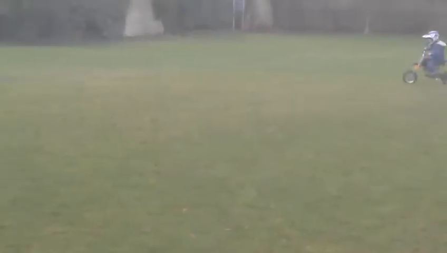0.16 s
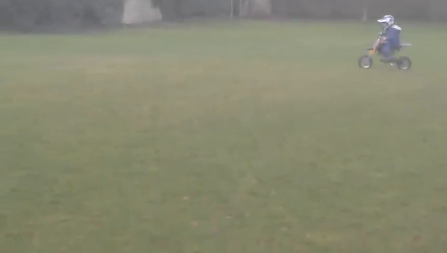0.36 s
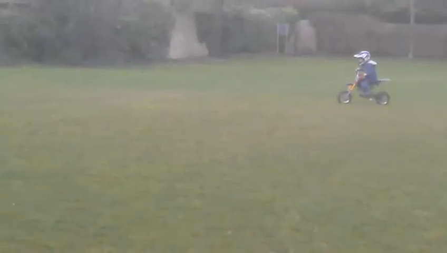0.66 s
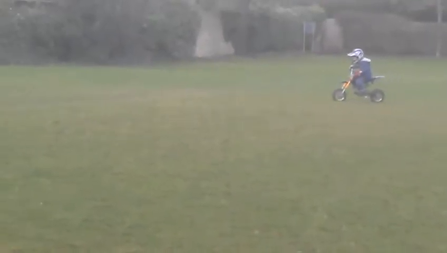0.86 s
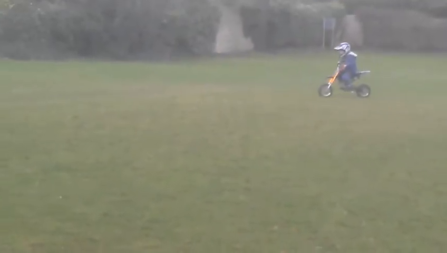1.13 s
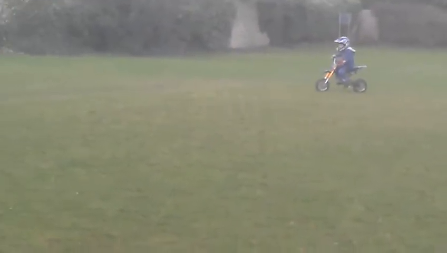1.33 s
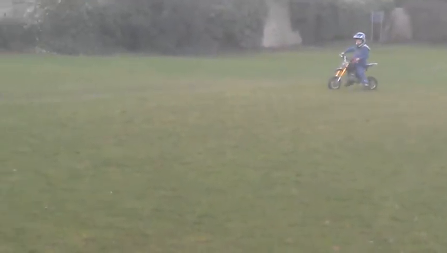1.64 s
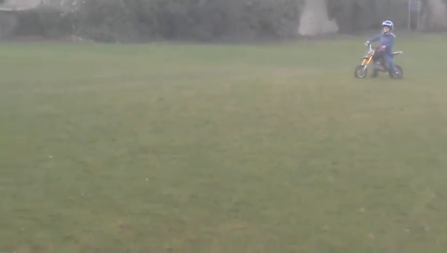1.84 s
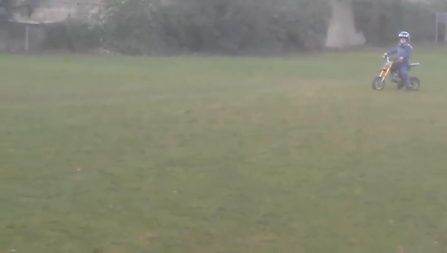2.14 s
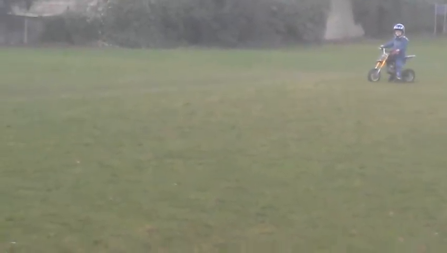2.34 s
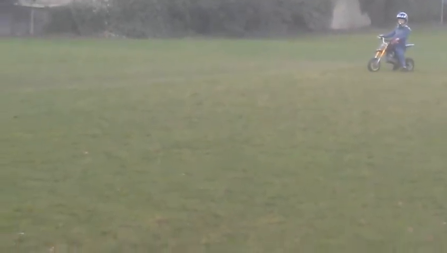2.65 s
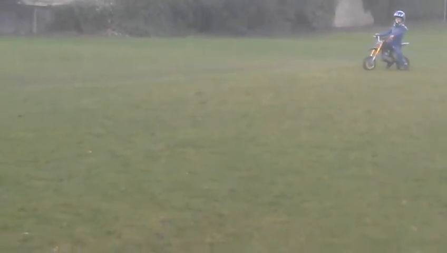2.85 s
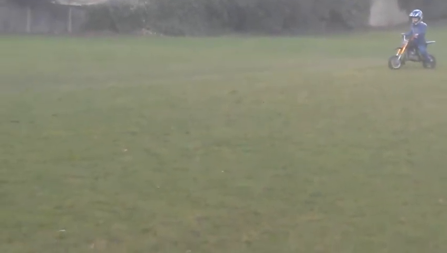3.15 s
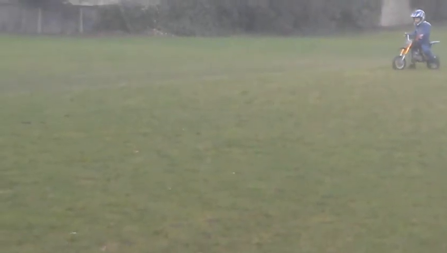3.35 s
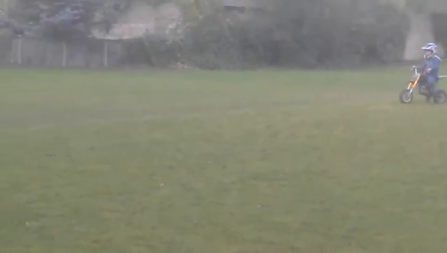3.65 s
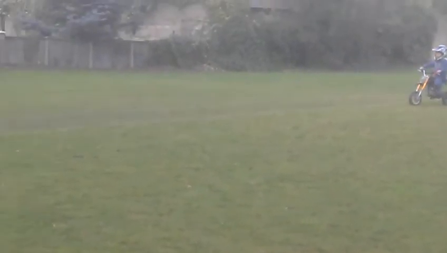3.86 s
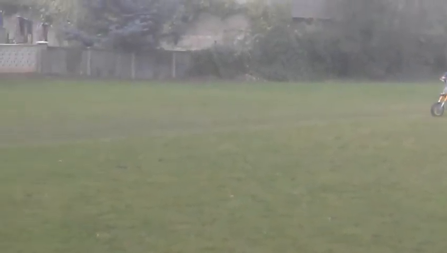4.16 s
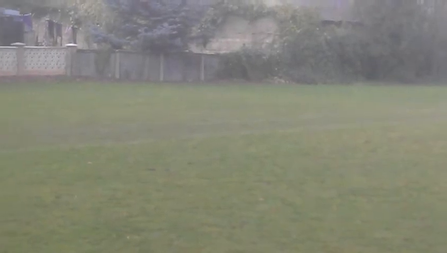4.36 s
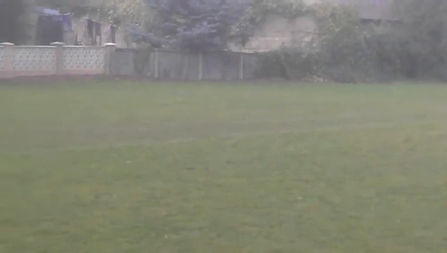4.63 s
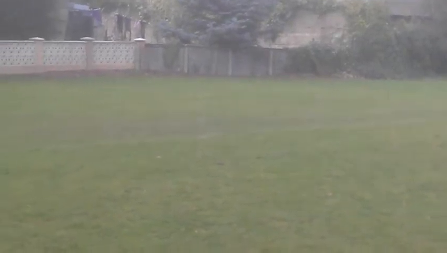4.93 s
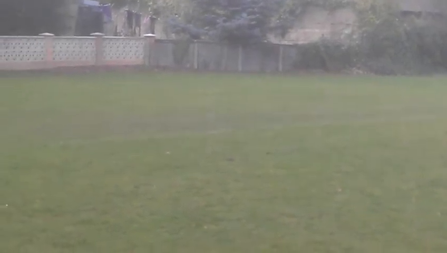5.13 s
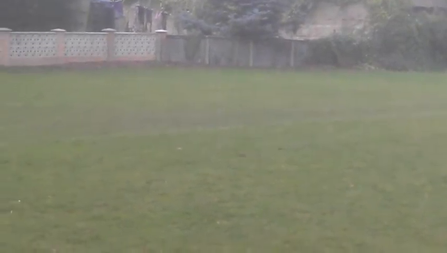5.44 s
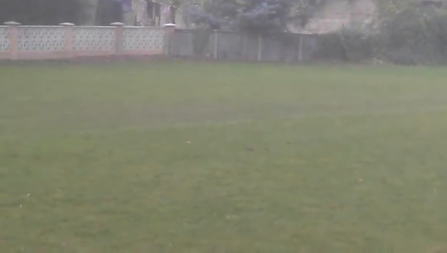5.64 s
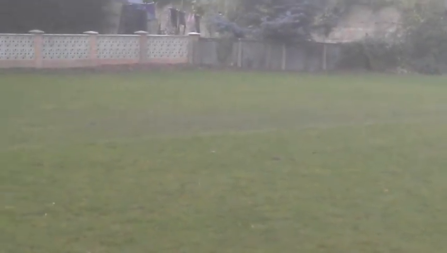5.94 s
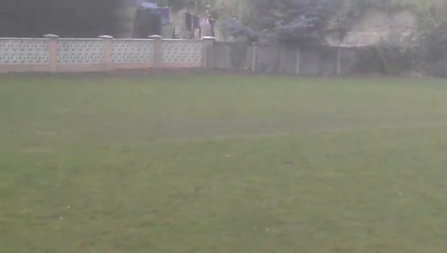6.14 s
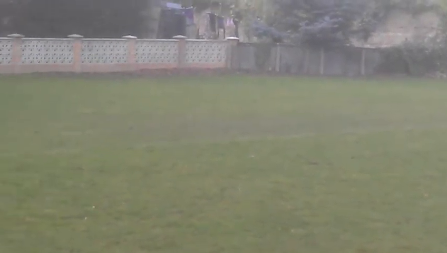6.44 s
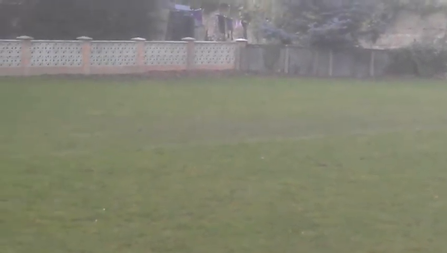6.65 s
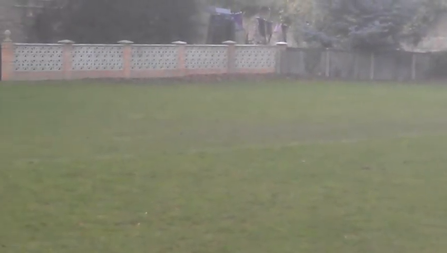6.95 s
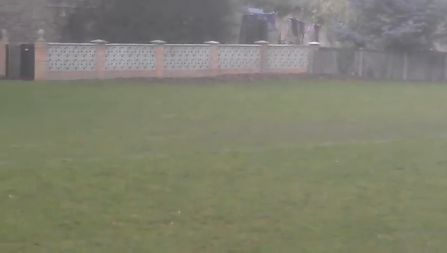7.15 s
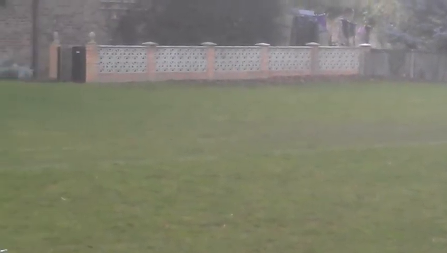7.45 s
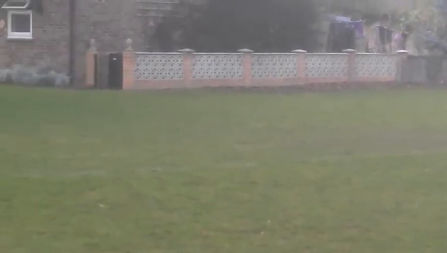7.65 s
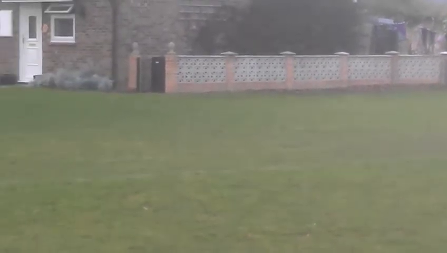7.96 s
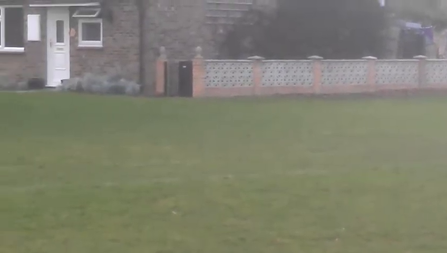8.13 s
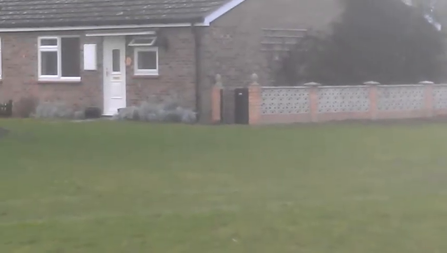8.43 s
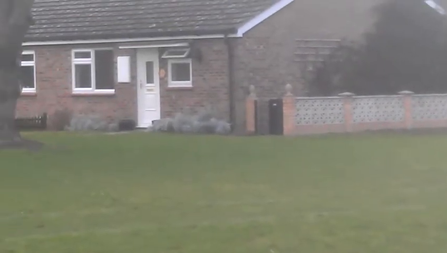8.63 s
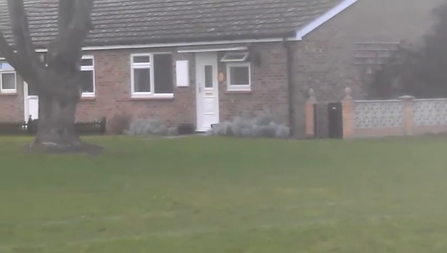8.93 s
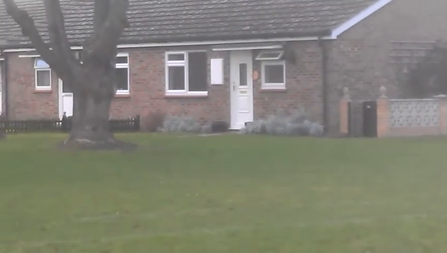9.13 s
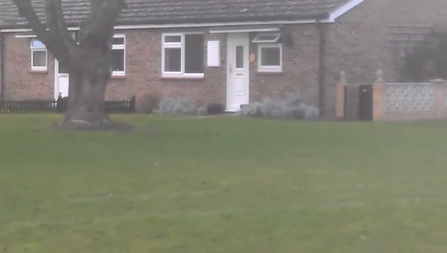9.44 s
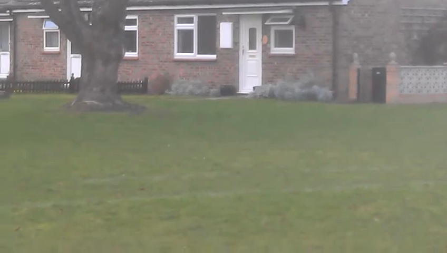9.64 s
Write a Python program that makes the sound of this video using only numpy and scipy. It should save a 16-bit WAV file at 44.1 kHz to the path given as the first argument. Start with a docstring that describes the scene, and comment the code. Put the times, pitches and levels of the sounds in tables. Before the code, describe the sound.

A small electric bike is blipped on and off, with a thin high whine, rattling chain rushes, ticks and one sharp snap.

```python
"""A small electric bike is blipped on and off on a lawn, close to a stereo camera microphone.
Each blip starts with the controller's switching whine, whose sidebands spread as the motor speeds up;
the gears sing, and chain and tyres rush up to a rattle at release. Loose parts tick, plastic snaps
and short pips ring. A bird chirps between the garden walls; far off are faint hums, traffic and wind."""
import sys
import numpy as np
from scipy import signal
from scipy.fft import rfft, irfft, next_fast_len
from scipy.io import wavfile
from scipy.ndimage import uniform_filter1d

SR = 44100
rng = np.random.default_rng(int(sys.argv[2]) if len(sys.argv) > 2 else 0)


def unload_audio(sound):
    """Save the sound as a 16-bit wav file, at the path given as the first command line argument."""
    columns = np.transpose(np.atleast_2d(sound))
    # keep every value between -1 and 1, then stretch to whole-number steps
    steps = np.round(np.clip(columns, -1, 1) * 32767)
    wavfile.write(sys.argv[1], SR, steps.astype(np.int16))


N = 431723
T = np.arange(N) / SR
FFT_SIZE = next_fast_len(N)
BIN_HZ = np.maximum(np.fft.rfftfreq(FFT_SIZE, 1 / SR), 1)

# The chain's rush from close by, as the microphone colours it: bright band, low body and top hiss.
# Each row: frequency in Hz, relative spectral density in dB.
BRIGHT_RUSH_SPECTRUM = [(1800, -33), (2500, -8.5), (3000, 3), (3800, 4), (4650, -2.5), (5300, 1),
                        (5900, 0.5), (6600, -11.5), (7000, -33)]
BODY_SPECTRUM = [(35, -69), (60, -31.5), (187, -7.5), (411, -8.5), (481, -2), (725, -1), (918, -5),
                 (1300, -2), (1750, -7.5), (1960, -5.5), (2600, -18.5), (3380, -18), (5720, -120)]
HISS_SPECTRUM = [(6200, -60), (6700, -9.5), (7300, 0), (7800, 7), (8400, 2), (9200, -10), (10200, -5),
                 (11300, -16.5), (12600, -17), (13500, -58)]


def chain_and_tyres():
    """Dense, uneven impacts of chain links and of tyres on grass merge into a grainy rush."""
    bright, body, hiss = surge_gains()
    grain = undb(3.5 * walk(900) + 0.77 * walk(60) + 1.7 * walk(21))
    high = patchy(grain * rng.standard_normal((2, N)), patch_db=3.5)
    low = patchy(grain ** 0.24 * rng.standard_normal((2, N)), patch_db=2.0)
    return (bright * colour(high, BRIGHT_RUSH_SPECTRUM) + body * colour(low, BODY_SPECTRUM)
            + hiss * colour(high, HISS_SPECTRUM))


# Surges of the drive. Each row: release in seconds, seconds of drive before it, climb in dB per second,
# rattle at release in dB, fall in dB per second, then the peaks of bright band, body and hiss in dB.
SURGE_EVENTS = [(.52, .9, 10, -0.5, 73, -45.5, -45, -41), (0.664, 0.014, 500, 4, 88, -39.5, -40, -43),
                (1.0, 0.14, 42, 0.5, 32, -55, -52.5, -65), (1.89, .08, 122, 2, 118, -61.5, -54, -63),
                (2.07, 0.11, 90, 3, 58, -62.5, -52, -61), (2.33, 0.13, 80, 3, 50, -62, -51.5, -62),
                (2.82, .13, 61, 1.5, 22.5, -57, -49, -59.5), (2.931, .04, 148, 5, 90, -53, -47, -50.5),
                (3.56, 0.026, 196, 3.5, 33, -49, -50, -56), (3.801, 0.26, 41.5, 0.5, 74, -50, -46.5, -50),
                (4.67, 0.16, 124, -4, 148, -44.5, -47, -43),
                (4.761, 0.093, 84, 2.5, 122, -34.5, -36, -30.5),
                (5.538, 0.41, 48, 4.5, 93, -38.5, -37.5, -39), (5.94, .09, 85, 0.5, 63, -54, -51, -58),
                (6.45, .14, 56, 2.5, 25, -49, -48, -50), (6.58, 0.14, 58, 2.5, 111, -41.5, -42, -42.5),
                (7.06, .07, 96, -1, 26, -50.5, -52.5, -50.5), (7.229, .15, 72, 3.5, 131, -33.5, -34, -35),
                (7.68, 0.1, 120, 2.5, 29, -45.5, -48.5, -44), (7.88, 0.21, 85, 2, 112, -30, -31, -29.5),
                (8.54, 0.31, 103, 0, 95, -28, -31, -29.5), (9.08, .06, 66, 0.5, 60, -46.5, -48, -57),
                (9.36, .14, 100, 1.5, 87, -41, -41, -37)]
# Rolling on the grass between surges. Each row: time in seconds, then bright band, body and hiss in dB.
ROLLING_LEVELS = [(0, -65, -61, -58), (.85, -68, -63.5, -59.5), (1.3, -60.5, -67, -66),
                  (1.7, -69.5, -61.5, -70.5), (1.8, -83, -71, -70.5), (2.5, -78, -57, -71.5),
                  (3.1, -72, -69, -78), (3.5, -65, -58.5, -72), (4.001, -73, -60, -69.5),
                  (4.4, -68.5, -58.5, -71.5), (5.05, -72, -58.5, -84), (5.75, -65, -63.5, -60.5),
                  (6.23, -80, -64, -71.5), (6.85, -73, -70, -69.5), (7.45, -64, -62.5, -66.5),
                  (8.15, -55, -53, -60.5), (8.9, -52.5, -52.5, -58), (9.2, -59.5, -62, -58.5),
                  (9.6, -66, -64, -73), (9.79, -64, -61.5, -66)]


def surge_gains():
    """Gains of the three bands: over the rolling, each surge climbs to a rattle and falls away."""
    take_up_db_per_s, rattle_s, shut_s = 345, 0.013, 0.039
    times, *levels = np.transpose(ROLLING_LEVELS)
    power = np.array([undb(2 * np.interp(T, times, db)) for db in levels])
    for release, driven, climb, rattle_db, fall, *peak_db in SURGE_EVENTS:
        here = slice(max(int((release - 1) * SR), 0), int((release + 1) * SR))
        t = T[here] - release
        after = np.maximum(t, 0)
        db = climb * np.minimum(t, 0) - fall * after
        db += take_up_db_per_s * np.minimum(t + driven, 0)  # far softer before the drive takes up
        db -= rattle_db * (1 - np.exp(-np.abs(t) / rattle_s))
        shut_db = np.outer([3.5, 1, 9], 1 - np.exp(-after / shut_s))  # extra drop as the throttle shuts
        power[:, here] += undb(2 * (np.array(peak_db)[:, None] + db - shut_db))
    return np.sqrt(power)


# Throttle blips, close to the microphone. Each row: start, time to peak and length in seconds, pitch in
# Hz, peak in dB, swell up to it in dB, final sideband spread in Hz, sidebands against the tone in dB.
BLIPS = [(0, 0.54, 0.54, 7795, -43.5, -4.5, 128, -18), (1.819, 0.073, .12, 7860, -52.5, 14, 650, -4),
         (1.999, 0.054, 0.15, 7855, -51, 9, 500, -8), (2.238, 0.11, 0.16, 7840, -50.5, 13, 151, -12),
         (2.501, 0.45, .46, 7820, -60, 9.5, 219, 3.5), (3.259, 0.64, 0.62, 7830, -57, 14, 351, 3.5),
         (4.436, 0.2, 0.24, 7810, -43, 21.5, 420, -5), (5.09, .21, 0.25, 7825, -61.5, 3.5, 425, -14),
         (5.841, 0.07, .13, 7840, -48, 14, 376, -12), (6.253, 0.13, .17, 7840, -54, 7, 415, -13),
         (6.902, 0.19, .2, 7810, -48.5, 22, 428, -18), (7.552, 0.11, .15, 7820, -47, 23, 398.6, -11),
         (8.175, 0.19, 0.23, 7822, -43.5, 18, 420, -17), (9.157, 0.15, .16, 7845, -57, 0, 402, -16)]
# Sidebands of the switching tone. Each row: multiple of the spread, relative level in dB.
SIDEBAND_LEVELS = [(-2, -13), (-1, 1.5), (1, -3.5), (2, -16)]
# A thin whine near 4 kHz during the opening blip. Each row: time in seconds, pitch in Hz, level in dB.
OPENING_WHINE = [
    [(0, 3980, -55.5), (.55, 4010, -62)],
]


def controller():
    """Commutation modulates the switching tone: pairs of sidebands at one and two times the speed."""
    fade_db, start_spread_hz = 13.5, 99
    tone_tracks, spread_tracks = [], []
    for start, rise, length, pitch, db, swell_db, top_spread_hz, side_db in BLIPS:
        peak, end = start + min(rise, length), start + length
        tone_tracks.append([(start, pitch, db - swell_db), (peak, pitch, db), (end, pitch, db - fade_db)])
        spread_tracks.append([(start, start_spread_hz, side_db), (end, top_spread_hz, side_db)])
    hz, gain = follow(tone_tracks)
    spread, side_gain = follow(spread_tracks)
    sidebands = sum(undb(db) * wobbly(hz + order * spread, 35, 6, 70) for order, db in SIDEBAND_LEVELS)
    flicker = undb(3 * walk(30))
    switching = gain * flicker * (wobbly(hz, 7.4, 5.1, 50) + side_gain * sidebands)
    whine_hz, whine_gain = follow(OPENING_WHINE)
    return switching + whine_gain * wobbly(whine_hz, 66, 6.6, 110)


# The gears singing close by. Each row: start and length in seconds, starting pitch in Hz,
# climb in Hz per second, level after the attack in dB, swell to the end in dB.
GEAR_RUNS = [(0, .58, 1088, -19, -55.5, -3.5), (4.58, 0.13, 1340, 751, -51.5, 2),
             (5.202, 0.16, 1300, 999, -53, -1), (6.379, 0.23, 1020, 2496.5, -46, -2.5),
             (7.014, 0.091, 1097, 3202, -44, -9), (7.635, .12, 1176, 2254, -43.5, 0.5),
             (8.294, .2, 1247, 500.5, -54, 12), (9.272, .11, 1100, 1799, -45.5, -2)]


def gears():
    """Meshing teeth make a rough tone that follows the speed up to a top pitch and breaks up."""
    top_hz, attack_s, attack_db = 1467, 0.043, 15
    tracks = [[(start, pitch, db - attack_db),
               (start + attack_s, pitch + climb * attack_s, db),
               (start + length, pitch + climb * length, db + swell_db)]
              for start, length, pitch, climb, db, swell_db in GEAR_RUNS]
    hz, gain = follow(tracks, fade_s=0.025)
    hz = np.minimum(hz, top_hz)
    rasp = undb(4.5 * walk(40))
    return gain * rasp * (wobbly(hz, 35, 5, 90) + undb(-2) * wobbly(hz, 110, 5, 200))


# Loose parts on the bike. Each row: start in seconds, peak in dB, relative low body in dB,
# seconds to die away by 60 dB.
PART_TICKS = [(.161, -30, 5, 0.029), (0.876, -36, -7.5, 0.04), (0.8905, -39, 3.5, 0.029),
              (0.9653, -28.5, -7, 0.06), (1.038, -30, -12, 0.091), (1.2386, -42, -14, 0.036),
              (1.4722, -40, -18, 0.025), (2.9856, -36.5, -9, 0.022), (3.909, -39.5, -7, 0.04),
              (4.826, -35, 7, 0.034), (5.1497, -44.5, -5, 0.041), (6.312, -41.5, -5, 0.047),
              (6.9903, -36.5, -10, 0.04), (7.225, -22, -5, 0.021), (7.8644, -15.5, -36, 0.03),
              (7.9014, -37, -6, 0.04), (8.12, -36, -13, 0.04), (8.1778, -36, 1, 0.028),
              (8.382, -29, 0, 0.04), (8.659, -22.5, -7, 0.027), (8.7192, -30.5, 8, 0.035),
              (8.9007, -37.5, -4, 0.027), (8.979, -30.5, -5, 0.015), (9.0938, -24.5, -4, 0.054),
              (9.17, -34.5, 2, 0.045), (9.696, -47, -2, .025)]


def loose_parts():
    """Each tick of a loose part is a short rattle in the colours of the rush, quick to rise."""
    out, t = np.zeros((2, N)), T[:SR // 12]
    rise_s = 0.001
    bright, hiss, body = (colour(rng.standard_normal((2, N)), spectrum)
                          for spectrum in (BRIGHT_RUSH_SPECTRUM, HISS_SPECTRUM, BODY_SPECTRUM))
    high = bright + undb(2.5) * hiss
    for start, peak_db, body_db, t60 in PART_TICKS:
        here = slice(int(start * SR), int(start * SR) + len(t))
        envelope = (1 - np.exp(-t / rise_s)) * undb(-60 * t / t60)
        rattle = (high[:, here] + undb(body_db) * body[:, here]) * envelope
        add(out, start, undb(peak_db) * rattle / np.abs(rattle).max())
    return out


# One snap and its bounce, off to the side of the microphone. Each row: start in seconds, peak in dB,
# gain from 0 to 1 of the part that both ports share.
SNAP_HITS = [(0.6524, -4, 1), (0.661, -31, 0.5)]
# Modes of the plastic. Each row: frequency in Hz, relative level in dB, seconds to die away by 60 dB.
PLASTIC_MODES = [(1290, -36, 0.0052), (1940, -7, 0.0064), (2350, 4.5, 0.0029), (3150, 3.5, 0.0031),
                 (5800, 3, 0.0038), (7600, -2, 0.011), (9040, -13.5, 0.011), (10570, -1, 0.0034),
                 (11900, -13, 0.0041)]


def plastic_snaps():
    """A hard snap rings the modes of the plastic for a few milliseconds."""
    out, t = np.zeros((2, N)), T[:SR // 8]
    hz, db, t60 = np.transpose(PLASTIC_MODES)[:, :, None]
    attack = 1 - np.exp(-t / 0.0003)
    for start, peak_db, shared in SNAP_HITS:
        detune = 1 + 0.02 * rng.standard_normal((2, len(hz), 1))
        modes = undb(db - 60 * t / t60) * np.sin(2 * np.pi * hz * detune * t)
        snap = attack * modes.sum(axis=1)
        add(out, start, undb(peak_db) * snap / np.abs(snap).max() * np.array([[shared], [1]]))
    return out


# Ringing pips among the ticks. Each row: start in seconds, peak in dB, pitch in Hz.
PIP_NOTES = [(0.6115, -45, 3830), (0.6848, -40, 3460), (0.7044, -44, 3910), (0.7467, -47, 3630),
             (0.8969, -47, 3900), (1.068, -46, 3870), (1.235, -49, 3420), (1.3743, -47, 3680),
             (7.2344, -28.5, 5247), (8.7211, -40, 3797), (9.288, -36, 3765), (9.39, -37, 3840),
             (4.668, -40, 1390), (7.226, -26.5, 1412), (7.232, -27.5, 1126), (7.9, -21.5, 1200),
             (7.926, -32.5, 1250)]


def pips():
    """Brief pure notes with soft edges."""
    out, t = np.zeros((2, N)), T[:SR // 8]
    rise_s = 0.0043
    envelope = (t / rise_s * np.exp(1 - t / rise_s)) ** 2
    for start, peak_db, hz in PIP_NOTES:
        phase = rng.uniform(0, 2 * np.pi, (2, 1))
        add(out, start, undb(peak_db) * envelope * np.sin(2 * np.pi * hz * t + phase))
    return out


# A bird in the garden. Each row: start and length in seconds, starting pitch in Hz,
# fall in Hz per second, level at mid-chirp in dB.
CHIRPS = [(2.651, 0.098, 4314, 6000, -44.5), (2.754, 0.13, 3750, 3850, -46),
          (2.923, 0.079, 3960, 2630, -44)]


def bird():
    """Hoarse falling chirps: three rough strands around the pitch, smeared by the garden walls."""
    edge_db = 10
    tracks = [[(start + share * length, pitch - fall * share * length, db - softer_db)
               for share, softer_db in ((0, edge_db), (0.5, 0), (1, edge_db))]
              for start, length, pitch, fall, db in CHIRPS]
    hz, gain = follow(tracks, fade_s=0.016)
    call = gain * sum(undb(db) * wobbly(hz * ratio, 300, 7, 260)
                      for ratio, db in ((0.9, -11), (1.0, -7), (1.12, -11)))
    t = T[:SR // 4]
    walls = rng.standard_normal(len(t)) * undb(-60 * t / 0.31)
    return call + undb(-1) * signal.fftconvolve(call, walls / np.linalg.norm(walls))[:N]


# Two hums far from the lawn, one track each. Each row: time in seconds, pitch in Hz, level in dB.
HUM_TRACKS = [
    [(1.8, 1850, -71), (1.9, 1810, -69), (2.1, 1820, -68), (2.4, 1734, -72), (2.8, 1702, -66),
     (3.2, 1843, -75), (4.15, 1830, -73), (4.3, 1837, -72)],
    [(4.4, 737, -63.5), (5.15, 751, -69.5), (5.3, 743, -55.5), (5.65, 756.5, -57.5), (6.3, 760, -73),
     (7.0, 772, -65), (8.2, 785, -69), (9.4, 799.4, -59.5), (9.79, 802, -72)],
]


def far_hums():
    """Faint tones that waver in pitch and level."""
    hz, gain = follow(HUM_TRACKS, fade_s=0.1)
    return gain * wobbly(hz, 12, 2.5, 40)


# The background around the lawn. Each row: frequency in Hz, relative spectral density in dB.
BACKGROUND_SPECTRUM = [(25, -8), (70, -10.5), (190, 3.5), (370, -7.5), (500, -4.5), (800, 3.5),
                       (1450, -19.5), (1900, -8), (2600, -16.5), (3600, -12.5), (5000, -18.5), (6600, -44),
                       (7800, -42), (9300, -52), (13000, -28), (13600, -67)]


def traffic_and_wind():
    """Distant traffic and wind in the hedges blend into a noise that swells slowly."""
    level_db = -62 + 1.3 * walk(1.5) + 0.6 * walk(9)
    return undb(level_db) * colour(rng.standard_normal((2, N)), BACKGROUND_SPECTRUM)


def undb(db):
    """Gain of a dB value."""
    return 10 ** (np.asarray(db) / 20)


def unit(x):
    """Scale to rms 1."""
    return x / np.sqrt(np.mean(x ** 2))


def over_hz(table):
    """Spread (Hz, value) rows over every bin, straight on a log axis."""
    hz, value = np.transpose(table)
    return np.interp(np.log(BIN_HZ), np.log(np.maximum(hz, 1)), value)


def colour(x, spectrum):
    """Shape a sound by a spectrum, rms 1."""
    return unit(irfft(rfft(x, FFT_SIZE) * undb(over_hz(spectrum)), FFT_SIZE)[:, :N])


def walk(rate):
    """Random levels held for 1 / rate seconds and smoothed twice."""
    hold = int(SR / rate)
    steps = np.repeat(rng.standard_normal(N // hold + 1), hold)
    return 0.66 * uniform_filter1d(uniform_filter1d(steps, hold), hold)[:N]


def follow(tracks, fade_s=0.0053):
    """Frequency and gain of a sound that plays only during its tracks of (seconds, Hz, dB) rows."""
    times, hz, db = np.concatenate(tracks).T
    on = sum((T >= rows[0][0]) & (T <= rows[-1][0]) for rows in tracks)
    gate = uniform_filter1d(1.0 * on, int(fade_s * SR))
    return np.interp(T, times, hz), undb(np.interp(T, times, db)) * gate


def wobbly(hz, wander_hz, flicker_db, rate):
    """A sine whose pitch and level wander, rate times a second."""
    phase = 2 * np.pi * np.cumsum(hz + wander_hz * walk(rate)) / SR
    return np.sqrt(2) * np.sin(phase) * undb(flicker_db * walk(rate))


def patchy(x, patch_db):
    """Narrow bands flare and fade on their own, as many small parts ring in turn."""
    bands = signal.stft(x, nperseg=512)[2]
    flare = uniform_filter1d(rng.standard_normal(bands.shape[1:]), size=3, axis=0)
    flare = uniform_filter1d(flare, size=5, axis=1)
    return signal.istft(bands * undb(patch_db * unit(flare)), nperseg=512)[1][:, :N]


def add(out, start, sound):
    """Mix in a short sound at a start time in seconds."""
    i = int(start * SR)
    out[:, i:i + sound.shape[1]] += sound[:, :N - i]


def scene():
    """Bike and garden in two rows: what the microphone's ports share, and what differs between them."""
    tones = controller() + gears() + bird() + far_hums()
    clatter = chain_and_tyres() + loose_parts() + plastic_snaps() + pips()
    return clatter + traffic_and_wind() + np.array([tones, 0.42 * np.roll(tones, 37)])


# Balance of the microphone's two ports. Each row: frequency in Hz, left minus right in dB.
PORT_BALANCE = [(60, -0.5), (110, 0.0), (200, 1.0), (360, 1.0), (660, 1.5), (1200, 3.0), (2190, 2.0),
                (3990, -0.5), (7270, -7.0), (13200, 4.0)]
# Phase between the ports. Each row: frequency in Hz, lead of the left in radians.
PORT_PHASE = [(0, 0), (1980, -0.1), (2330, -0.5), (2930, -7.1), (3700, -6.6), (4050, -6.8), (4480, -9.5),
              (5080, -9.6), (6120, -7.5), (7920, -13.4), (9040, -13.0), (9390, -15.1), (10900, -15.4),
              (13400, -18.6)]
# How alike the ports sound. Each row: frequency in Hz, likeness from 0 to 1.
PORT_LIKENESS = [(40, 0.8), (130, 0.87), (300, 0.88), (700, 0.84), (1500, 0.32), (3000, 0.63), (8000, 0.21),
                 (13000, 0)]


def record(dry):
    """Two ports in the camera housing hear each band with their own level and lag; bass and top are cut."""
    low_hz, top_hz = 122, 13350
    likeness, lead = over_hz(PORT_LIKENESS), over_hz(PORT_PHASE)
    shared, apart = rfft(dry, FFT_SIZE)
    shared *= np.sqrt((1 + likeness) / 2)
    apart *= np.sqrt((1 - likeness) / 2)
    skew = undb(over_hz(PORT_BALANCE) / 2) * np.exp(0.5j * lead)
    left, right = (shared + apart) * skew, (shared - apart) / skew
    # keep the power of the centre as it arrived
    centre = np.sqrt((np.abs(skew) ** 2 + np.abs(skew) ** -2 + 2 * likeness * np.cos(lead)) / 4)
    ports = irfft(np.array([left, right]) / centre, FFT_SIZE)[:, :N]
    bass_cut = signal.butter(2, low_hz, "high", fs=SR, output="sos")
    top_cut = signal.ellip(12, 0.2, 100, top_hz, fs=SR, output="sos")
    return signal.sosfilt(top_cut, signal.sosfilt(bass_cut, ports))


dry = scene()
out = record(dry)
unload_audio(out)
```